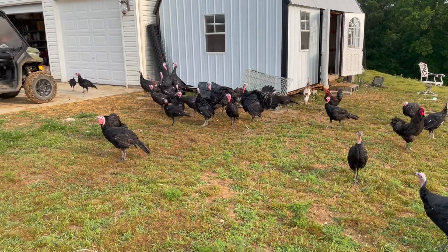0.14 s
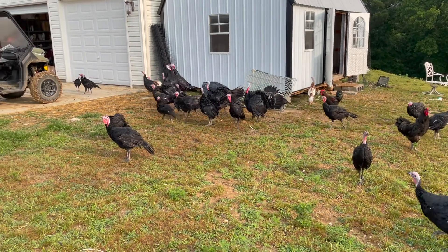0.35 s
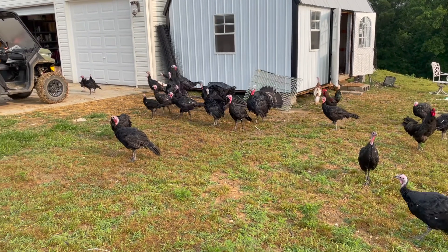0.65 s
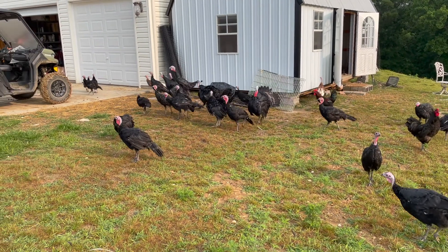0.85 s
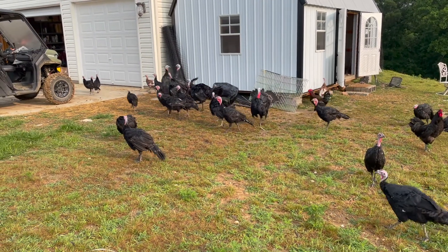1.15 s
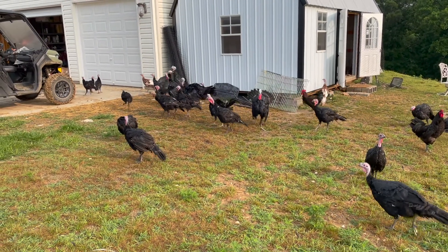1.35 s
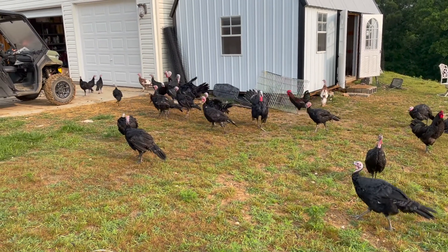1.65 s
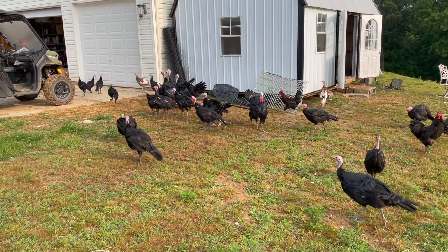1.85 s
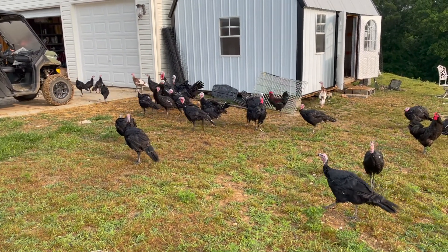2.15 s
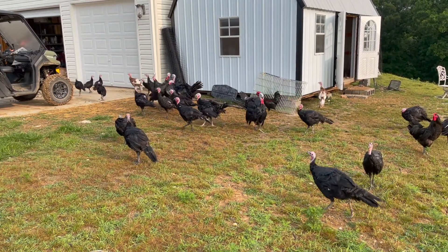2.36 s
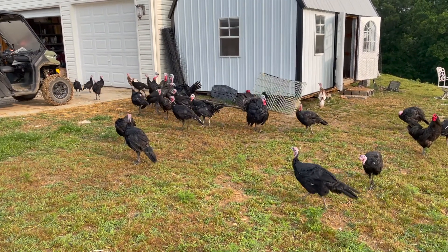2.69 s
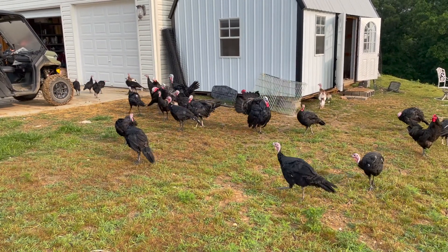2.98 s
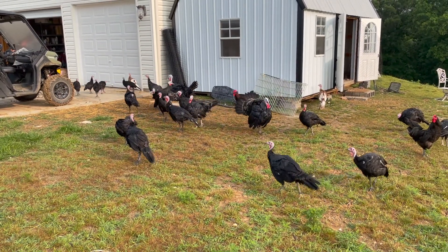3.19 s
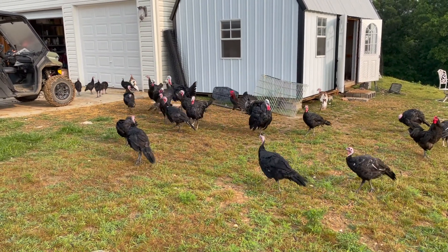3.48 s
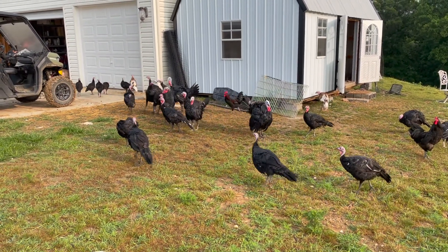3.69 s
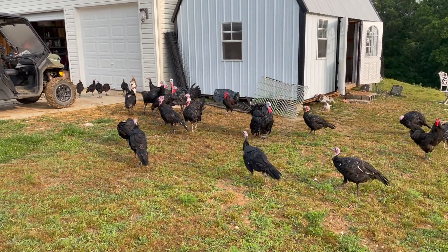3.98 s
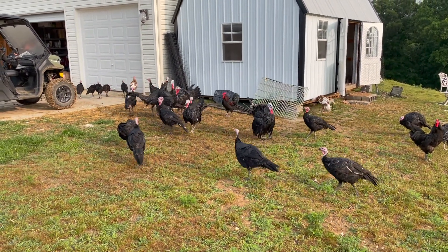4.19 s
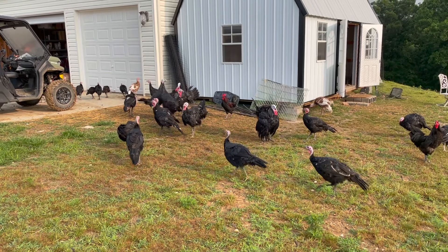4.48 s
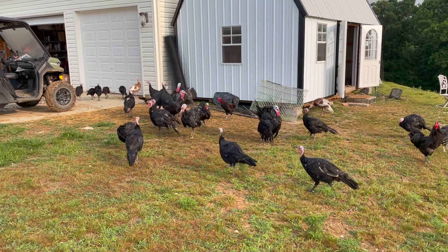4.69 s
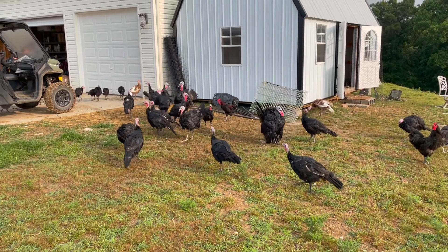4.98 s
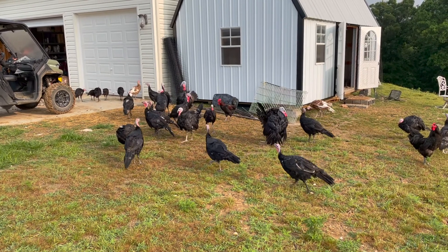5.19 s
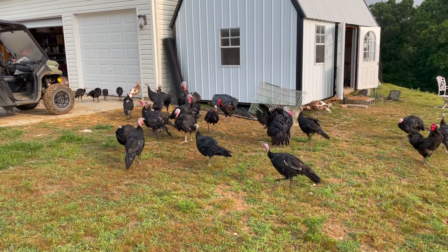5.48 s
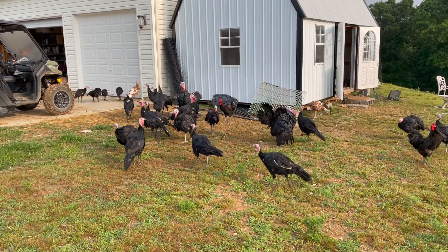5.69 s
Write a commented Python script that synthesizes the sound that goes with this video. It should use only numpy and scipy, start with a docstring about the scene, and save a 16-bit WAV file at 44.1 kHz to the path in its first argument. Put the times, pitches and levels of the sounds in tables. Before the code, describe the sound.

Overlapping turkey chirps, short rattling trills and a few hoarse yelps sound outdoors, with faint grass rustles, soft bumps and a low hum.

```python
"""On a farm lawn, turkeys whistle, chirp, trill and yelp around a hand-held stereo microphone.
Each voice is a stack of harmonics on a gliding pitch plus throat rasp, echoed by nearby walls and a barn.
Feet and feathers rustle in the grass as grainy bright noise; soft bumps are low tones with puffs of noise.
A machine hums on one drifting tone; light wind and the far yard with its insects are coloured noise."""
import sys
import numpy as np
from scipy import signal
from scipy.fft import rfft, irfft, next_fast_len
from scipy.io import wavfile
from scipy.ndimage import uniform_filter1d, map_coordinates

SR = 44100
rng = np.random.default_rng(int(sys.argv[2]) if len(sys.argv) > 2 else 0)


def log_audio(samples):
    """Write samples as a 16-bit WAV file to the path given in sys.argv[1]."""
    # one column per channel
    frames = np.atleast_2d(samples).T
    # limit to full scale, then quantise
    limited = np.clip(frames, -1, 1)
    pcm = np.round(limited * 32767).astype(np.int16)
    wavfile.write(sys.argv[1], SR, pcm)


def boost(x):
    """Linear amplitude factor 10**(x/20) for a level x in decibels (scalar or array-like)."""
    u = np.asarray(x, float) / 20
    return 10 ** u


N = 257544

# Voice levels are before the throat colour. Noise spectra give shape only: each noise is scaled to rms 1.
# long whistles, one curve each: (t/s, f/Hz, level/dB)
WHISTLE_CURVES = [
    [(0.0, 1360, -19.5), (0.03, 1241, -34), (0.05, 1105, -22), (0.1, 1057, -26), (0.13, 1230, -50)],
    [(0.1, 1378, -39), (0.14, 1465, -35), (0.185, 1530, -34)],
    [(0.445, 1038, -46), (0.48, 1046, -42), (0.52, 1048, -50)],
    [(1.24, 746, -41), (1.255, 1055, -26.5), (1.27, 1140, -25.5), (1.28, 1480, -39)],
    [(0.33, 1610, -27), (0.352, 1330, -18), (0.38, 1220, -18), (0.39, 1186, -25.5), (0.42, 1039, -17)],
    [(0.445, 1483, -38), (0.475, 1294, -32), (0.5, 1530, -38), (0.52, 1350, -54.5)],
    [(0.685, 1544, -24), (0.705, 1330, -17), (0.725, 1225, -17), (0.75, 1201, -20), (0.77, 1090, -26.5),
     (0.795, 1385, -25.5)],
    [(0.9, 788, -54), (0.92, 1162, -36.5), (0.97, 1106, -41), (1.05, 1056, -42), (1.14, 1131, -40),
     (1.18, 1060, -36), (1.215, 675, -52.5)],
    [(1.31, 1220, -43.5), (1.37, 1063, -36.5), (1.395, 680, -56)],
    [(1.44, 1662, -37.5), (1.455, 1653, -24), (1.5, 1460, -36), (1.508, 1520, -47), (1.52, 1546, -25.5),
     (1.57, 760, -41.5)],
    [(2.09, 1077, -25), (2.12, 1283, -39.5), (2.175, 1282, -23)],
    [(2.5, 1627, -38), (2.55, 1500, -29.5), (2.6, 1427, -33), (2.64, 1254, -36), (2.71, 1145, -33.5)],
    [(2.78, 1915, -36), (2.8, 2077, -37.5), (2.82, 1895, -29.5), (2.89, 1890, -54.5)],
    [(2.785, 1562, -39.5), (2.82, 1603, -36), (2.835, 1338, -28), (2.862, 1354, -29.5)],
    [(4.945, 785, -57), (4.97, 1081, -32), (5.03, 1086, -29), (5.085, 1070, -26.5)],
]
# whistle voices: (left over right/dB, 2nd harmonic/dB, 3rd harmonic/dB)
WHISTLE_VOICES = [(2.5, -24, -50), (2.5, -13, -41), (2, -2, -2.5), (7.5, -2, -33), (3, -20.5, -27.5),
                  (0, -20, -44), (1, -19.5, -31), (10, -10.5, -22), (13, -11, -35), (5.5, -40, -36),
                  (24, -10.5, -34), (7, -40, -36), (16, -26.5, -42), (2, -46, -48), (20, -16, -20.5)]
# single-glide chirps: (t/s, length/s, first f/Hz, last f/Hz, peak level/dB, place of peak/0-1, left over right/dB)
CHIRPS = [(0.033, 0.037, 1483, 1323, -30.5, .9, 3), (1.196, .025, 1690, 1030, -38.5, 0.06, 1),
          (3.046, 0.026, 1786, 1587, -22, 0.75, 11.5), (3.41, 0.025, 1785, 1624, -21, 0.78, 12),
          (1.272, .04, 1560, 1480, -20, .4, 3.5), (1.425, .03, 715, 1330, -27.5, 0.51, 6),
          (1.54, 0.079, 1540, 1452, -30, 0.94, 4), (1.62, 0.055, 1790, 1800, -46, .45, 7),
          (1.72, 0.062, 1810, 1844, -42.5, .9, 16), (1.854, 0.033, 2175, 2096, -22.5, 0.93, 1),
          (2.075, 0.02, 1560, 1490, -33, .9, 4), (2.328, 0.1, 2270, 2110, -44.5, 0.6, -1),
          (2.491, .04, 745, 1285, -25, 0.43, 6), (2.592, 0.048, 1240, 860, -30.5, .1, 10),
          (2.703, 0.029, 753, 1745, -28.5, 0.65, 13.5), (2.736, 0.022, 1970, 2024, -31, .9, -4),
          (2.73, 0.043, 4070, 3900, -41.5, 0.37, 6), (2.84, .04, 1250, 718, -34, .4, 9),
          (3.003, .032, 1580, 1380, -27.5, 0.8, 6.5), (3.475, .05, 1810, 1620, -25, .4, 20),
          (3.31, 0.039, 1074, 1070, -22.5, 0.9, 1), (3.733, .04, 1149, 1012, -18, 0.63, 1),
          (4.009, 0.038, 1570, 1620, -40.5, 0.5, 1.5), (4.064, .025, 1575, 1630, -34.5, .9, 0),
          (4.087, 0.042, 1169, 1010, -16.5, 0.56, -3.5), (4.42, .05, 1212, 1063, -11.5, .65, -4),
          (4.428, 0.034, 1770, 1630, -35.5, 0.6, 2), (4.771, 0.022, 1300, 780, -36.5, 0.17, 4),
          (4.959, 0.063, 787, 760, -43.5, 0, 2), (5.636, .12, 1750, 1470, -56.5, 0.5, 7),
          (5.74, 0.038, 1200, 1020, -52, 0.15, 18), (5.81, 0.027, 1120, 1127, -40, 0.87, 7)]
# trills, one run of notes each: (t/s, length/s, held f/Hz, level/dB)
TRILL_NOTES = [
    [(0.19, 0.022, 1188, -25), (0.258, 0.017, 1176, -26), (0.315, 0.01, 1178, -25),
     (0.372, 0.012, 1195, -26), (0.43, 0.018, 1063, -26.5)],
    [(0.518, 0.019, 1005, -28), (0.578, 0.02, 1015, -30), (0.63, 0.01, 892, -23.5),
     (0.68, 0.012, 899, -23.5), (0.728, 0.015, 922, -26.5)],
    [(1.62, 0.051, 1175, -30.5), (1.72, 0.038, 1184, -26), (1.8, 0.021, 1178, -26),
     (1.86, 0.011, 1171, -26.5), (1.915, 0.015, 1125, -24)],
    [(1.85, 0.128, 934.4, -27), (2.01, 0.021, 914, -28.5), (2.06, 0.023, 924, -23.5),
     (2.11, 0.013, 879, -22.5), (2.155, 0.019, 917, -19.5)],
    [(2.22, 0.046, 1012, -27), (2.3, 0.021, 1110, -31), (2.345, 0.021, 1030, -28),
     (2.39, 0.027, 1030, -28.5), (2.43, 0.015, 853, -35)],
    [(3.03, 0.053, 1210, -27.5), (3.135, 0.038, 1220, -25), (3.209, 0.019, 1155, -23),
     (3.268, 0.015, 1122, -22.5), (3.323, 0.013, 1110, -24)],
    [(3.825, 0.12, 1080, -31.5), (3.98, 0.031, 1091, -30.5), (4.05, 0.017, 1045, -24.5),
     (4.15, 0.019, 1045, -24.5)],
    [(4.575, 0.015, 1424, -38.5), (4.633, 0.016, 1357, -34), (4.683, 0.015, 1333, -33),
     (4.735, 0.014, 1344, -33)],
    [(5.118, 0.03, 1047, -26.5), (5.181, 0.023, 1017, -22), (5.234, 0.015, 995, -20.5),
     (5.28, 0.018, 991, -19), (5.323, 0.013, 1057, -24), (5.365, 0.011, 872, -39.5)],
]
# trill voices: (left over right/dB, 2nd harmonic/dB, f between notes/Hz,
# upward flick/dB, fall into the note/dB, slap of a near wall/dB)
TRILL_VOICES = [(4.5, -13.5, 2200, -16, -21.5, -30.5), (5, -17.5, 1600, -10.5, -34.5, -9),
                (8, -8, 1900, -14.5, -25.5, -31), (6, -10.5, 1500, -13.5, -25.5, -1.5),
                (11.5, -17, 1500, -16, -22, -1.5), (9, -7.5, 2100, -12, -32, -31),
                (12.5, -24, 1500, -13, -13, -31), (2.5, -11, 2100, -4.5, -22.5, -30),
                (8, -12, 1650, -14, -13, -2.5)]
# yelps: (bird, t/s, length/s, first pulse rate f/Hz, last f before the upturn/Hz, level/dB, left over right/dB)
YELPS = [("thin", 2.615, .105, 420, 374, -39, 0), ("hoarse", 3.06, .11, 442, 365, -25.5, 9.5),
         ("clear", 3.348, 0.11, 429, 398, -32, -3), ("hoarse", 3.428, .125, 451, 380, -27, 26),
         ("clear", 3.77, .09, 436, 380, -30, -1.5), ("clear", 4.125, 0.088, 440, 378, -27, .6),
         ("clear", 4.465, 0.078, 455, 380, -31, -2.2)]
# harmonics 1-10 of each yelping bird: (level/dB, ..)
YELP_HARMONICS = {"thin": (-23, -4.5, -6, 1.5, 13, -6, -2, -11, -12, -14),
                  "hoarse": (-37.5, -14, -8, -0.5, -3.5, -14, -13, -12, -14, -19),
                  "clear": (-36, 0, -4, 4, -20, -7, -15, -27, -29, -30)}
# hoarseness of each bird: (pitch scatter/0-1, flutter of the partials/dB, rasp over the strongest harmonic/dB)
HOARSENESS = {"thin": (.006, 2.5, -20), "hoarse": (.019, 4, -6), "clear": (.008, 2.8, -17)}
# sag of each bird: (power of the curve, under 1 early, over 1 late; level lost by the end/dB; opening swell/s)
YELP_SAG = {"thin": (1.8, 5.9, 0.031), "hoarse": (2.4, 10, .01), "clear": (.6, 5.4, 0.0027)}
# throat rasp spectrum: (f/Hz, level/dB)
RASP_SPECTRUM = [(400, -17.5), (900, 1.5), (1500, 2), (2200, 0), (2700, -28.5), (3300, -16.5),
                 (4000, -13.5), (5000, -19), (7000, -34.5), (12000, -87.5)]
# throat and the bounce off the lawn, colouring every harmonic: (f/Hz, level/dB)
THROAT = [(300, 12), (1300, -2), (1700, 3.5), (1900, -1.5), (2300, -0.5), (2700, -2), (3300, -8.5),
          (3900, -1), (4400, -12), (16000, -28)]
# first wall echoes: (delay t/s, level/dB)
WALL_ECHOES = [(.004, -16), (.012, -13), (.021, -18)]
# decay of the barn wall echo: (f/Hz, t60/s)
BARN_DECAY = [(500, 0.16), (1600, 0.22), (4000, .15), (10000, 0.11)]
# louder rustles in the grass: (t of the peak/s, nominal level/dB)
RUSTLES = [(0.535, -51), (0.747, -41), (0.933, -39.5), (1.661, -52), (1.73, -48), (1.807, -51.5),
           (2.186, -53), (2.571, -53), (3.308, -48), (3.46, -46), (3.727, -50), (3.893, -47.5),
           (4.1, -47.5), (4.53, -51.5), (5.377, -46), (5.505, -51), (5.83, -48.5)]
# dry stalks snapping: (t/s, nominal level/dB)
STALK_SNAPS = [(0.5307, -42), (2.7986, -35), (2.8948, -38.5), (3.2957, -46.5)]
# rustling grass spectrum: (f/Hz, level/dB)
BLADES_SPECTRUM = [(1500, -27.5), (3500, -3), (6500, -7), (7800, -43.5), (9000, -31.5), (11000, -9),
                   (13500, -1), (15700, -13)]
# wing feathers dragging through the grass: (t/s, level/dB)
FEATHER_SCUFF = [(4.55, -60), (4.78, -41.5), (5.0, -60.5)]
# scuff spectrum, mid: (f/Hz, level/dB)
SCUFF_MID = [(1470, -24), (2500, -8), (2720, -9), (4020, -9.5), (5020, 5), (5590, -16), (6780, 5),
             (7600, -14), (8210, -79), (8400, -55), (9070, -11), (13600, -10), (15600, -15)]
# scuff spectrum, side, shared by the grass blades: (f/Hz, level/dB)
SCUFF_SIDE = [(1470, -35.5), (2500, -7.5), (3960, -30), (5140, 1), (6470, -5.5), (9140, -2), (13100, -25),
              (13400, -68), (15600, -85.5)]
# soft bumps near the microphone: (t/s, push level/dB, push f/Hz, puff level/dB)
BUMPS = [(0.459, -53, 143, -53), (0.659, -28.5, 65.5, -66), (0.749, -30, 56.5, -44.5),
         (0.927, -29, 49.4, -36), (1.597, -41, 110, -48), (1.831, -63, 154, -46), (3.421, -40, 144, -51.5),
         (3.881, -39.5, 145, -56), (4.97, -33.5, 150.6, -50), (5.307, -26, 96, -71)]
# machine hum: (t/s, f/Hz, level/dB)
MACHINE_HUM = [(0.0, 152, -71), (0.06, 156.7, -53), (1.949, 159.4, -37.5), (5.071, 162, -38.5),
               (5.84, 161.8, -45)]
# wind: (t/s, rumble level/dB, buffet level/dB)
WIND_LEVELS = [(0.0, -42.5, -44), (0.28, -45.5, -55), (0.85, -41.5, -43.5), (3.74, -43.5, -74),
               (4.31, -42.5, -51), (5.16, -44.5, -52.5), (5.34, -34.5, -39), (5.45, -47, -51),
               (5.84, -39.5, -45)]
# wind rumble spectrum: (f/Hz, level/dB)
RUMBLE_SPECTRUM = [(45, -7), (60, 1), (125, -0.5), (150, -7), (190, -26.5)]
# wind buffet spectrum: (f/Hz, level/dB)
BUFFET_SPECTRUM = [(12, -27.5), (25, -9), (50, -4.5), (65, -19.5)]
# far yard noise and the insect band, mid: (f/Hz, level/dB)
AIR_MID = [(110, -27), (180, -4.5), (213, -8.5), (475, -24.5), (1100, -25.5), (2160, -33), (2550, -39),
           (5600, -37.5), (6740, -19.5), (7400, -32.5), (7980, -93), (9800, -58.5), (11200, -43.5),
           (14000, -37.5), (15600, -60.5)]
# far yard noise and the insect band, side: (f/Hz, level/dB)
AIR_SIDE = [(110, -33.5), (180, 1.5), (293, -16), (484, -14), (1120, -12.5), (1330, -21.5), (2240, -20.5),
            (2650, -32), (7000, -13.5), (7830, -23.5), (11200, -27.5), (13000, -49.5), (15600, -75.5)]

RISE_DB, FADE_DB = 19, 15.5  # a chirp's climb and fall, each over a whole note length; yelps open with RISE_DB too
SECOND_DB, DULLER_DB = -18, 25.5  # 2nd harmonic of a chirp near 1 kHz; its loss per octave up
BRIGHTER_DB = 10  # gain of that harmonic per octave of upward glide
THIRD_UNDER_DB = 12.5  # 3rd harmonic under the 2nd, before a rising chirp lowers it further
OVERTONE_SPREAD, OVERTONE_LEFT_DB = 0.089, 6.5  # overtones spread less than the tone and lean left
TRILL_RASP_DB, CHIRP_RASP_DB = -21, -25  # the chirp figure is for a level or falling glide
SLAP_S = 0.012  # delay of the near wall slap in trills
LIFT, LIFT_SHARE = 0.06, 0.06  # upturn at a yelp's end: share of the last pitch, time constant as share of length
RUSTLE_RISE_S, RUSTLE_FALL_S = 0.017, 0.022
PATTER_DB, PATTER_SWING_DB = -70, 5.5  # small steps all the time


def unit(x):
    """Scales a signal to rms 1."""
    return x / np.sqrt(np.mean(x ** 2) + 1e-20)


def along(points, hz):
    """Reads (f/Hz, level/dB) points on a log frequency axis, near silent outside them."""
    f, v = np.transpose(points)
    return np.interp(np.log(hz + 1), np.log(f + 1), v, left=-120, right=-120)


def wobble(rate, size=N):
    """A smooth random curve through `rate` random knots a second."""
    knots = rng.standard_normal(int(size * rate / SR) + 4)
    return map_coordinates(knots, [np.arange(size) * rate / SR])


def noise(spectrum, size=N):
    """Coloured noise of rms 1: white noise weighted in frequency."""
    m = next_fast_len(size + 4096)
    weight = boost(along(spectrum, np.fft.rfftfreq(m, 1 / SR)))
    return unit(irfft(rfft(rng.standard_normal(m)) * weight, m)[:size])


def pair(mid, side, side_db, shared):
    """Stereo noise: part of the side is the same wave as the mid, a quarter cycle apart."""
    m = next_fast_len(N)
    hz = np.fft.rfftfreq(m, 1 / SR)
    a, b = rfft(rng.standard_normal((2, m)))
    side_wave = 1j * shared * a + np.sqrt(1 - shared ** 2) * b
    centre = unit(irfft(a * boost(along(mid, hz)), m)[:N])
    apart = unit(irfft(side_wave * boost(along(side, hz)), m)[:N])
    return centre + boost(side_db) * apart * np.array([[1], [-1]])


def add(out, s, x):
    """Mixes x into out from time s."""
    i = round(s * SR)
    out[:, i:i + x.shape[-1]] += x


def sing(out, rows, pans, harmonics_db, scatter, flutter_db, rasp_db):
    """A syrinx tone: harmonics on an unsteady pitch curve, with breath noise that swells once a cycle."""
    s, hz, db = np.transpose(rows)
    t = np.arange(s[0], s[-1], 1 / SR)

    def smooth(curve):
        return uniform_filter1d(np.interp(t, s, curve), size=110, mode="nearest")

    level = smooth(db)
    weakness = np.clip(db.max() - level - 8, 0, 20)
    shaky = scatter * (1 + weakness * 0.5)  # weak stretches lose their hold on pitch
    pitch = smooth(hz) * (1 + shaky * wobble(180, len(t)))
    phase = 2 * np.pi * np.cumsum(pitch) / SR
    edge = np.clip(np.minimum(t - s[0], s[-1] - t) / 0.0042, 0, 1)
    x = np.zeros((2, len(t)))
    for k, own_db in enumerate(harmonics_db):
        pan = pans[k >= len(harmonics_db) / 3]  # lower partials take the first pan, upper ones the second
        lead = rng.normal(0.097, 0.87) / 2  # each side hears the partial at another phase
        # overtones fade faster when the voice is soft
        soft = 1.5 * (k > 0) * np.minimum(level - db.max() + 4, 0)
        colour = along(THROAT, (k + 1) * pitch)
        size = boost(own_db + soft + colour + flutter_db * wobble(47.8, len(t)))
        size *= 1 + (0.03 + 0.06 * flutter_db) * wobble(500, len(t))  # a noisy skirt round each partial
        left_right = boost(np.array([[pan / 2], [-pan / 2]])) / np.cosh(pan / 17.4)  # steady sum of both sides
        wave = np.sin((k + 1) * phase + k + np.array([[lead], [-lead]]))
        x += size * left_right * np.sqrt(2) * wave
    rasp_mid, rasp_side = noise(RASP_SPECTRUM, len(t)), noise(RASP_SPECTRUM, len(t))
    rasp = rasp_mid + 0.6 * rasp_side * np.array([[1], [-1]])
    gate = 1 + 0.37 * np.sin(phase)
    x += boost(rasp_db + max(harmonics_db)) * gate * rasp
    add(out, s[0], x * edge * boost(level))


def whistle(out, rows, pan_db, second_db, third_db, scatter, rasp_db):
    """A syrinx tone with two overtones."""
    pans = pan_db, OVERTONE_SPREAD * pan_db + OVERTONE_LEFT_DB
    sing(out, rows, pans, (0, second_db, third_db), scatter, flutter_db=1.3, rasp_db=rasp_db)


def chirp(out, s, length, first_hz, last_hz, db, peak, pan_db):
    """One glide that swells to its peak and fades; low and rising chirps carry the strongest 2nd harmonic."""
    share = np.array([0, np.clip(peak, 0, 1), 1])
    bend = 0.65 if last_hz > first_hz else 1.3  # rising glides move early, falling ones late
    pitch = first_hz + (last_hz - first_hz) * share ** bend
    level = db - np.array([RISE_DB, 0, FADE_DB]) * abs(share - share[1])
    rows = np.c_[s + length * share, pitch, level]
    rising_db = BRIGHTER_DB * max(np.log2(last_hz / first_hz), 0)
    second_db = SECOND_DB - DULLER_DB * np.log2((first_hz + last_hz) / 2045.0) + rising_db
    third_db = second_db - THIRD_UNDER_DB - rising_db / 2
    whistle(out, rows, pan_db, second_db, third_db, scatter=0.006, rasp_db=CHIRP_RASP_DB + rising_db)


def trill_note(s, length, hz, db, top_hz, flick_db, fall_db):
    """The voice falls onto the pitch, swells as it holds it nearly level, and flicks up, weak while high."""
    first_hz, first_db = hz * (1 + 0.5 * length), db - 45 * length
    end = s + length
    fall = [(s - 0.012, top_hz * 0.9, db + fall_db), (s, first_hz * 1.03, first_db - 5)]
    hold = [(s + 0.004, first_hz, first_db), (end - 0.002, hz * 1.01, db)]
    flick = [(end + 0.003, hz * 1.17, db - 5), (end + 0.008, top_hz, db + flick_db)]
    fade = [(end + 0.015, top_hz, db + flick_db - 16)]
    return sorted(fall + hold + flick + fade)


def trill(out, notes, pan_db, second_db, top_hz, flick_db, fall_db, slap_db):
    """A run of hooked notes, each followed by its slap off the wall, returned as a layer shaped like out."""
    own = np.zeros_like(out)
    for s, length, hz, db in notes:
        voiced_s = max(length - SLAP_S * boost(slap_db), 0.008)  # a listed length includes a loud slap
        rows = trill_note(s, voiced_s, hz, db, top_hz, flick_db, fall_db)
        third_db = second_db - THIRD_UNDER_DB
        whistle(own, rows, pan_db, second_db, third_db, scatter=0.008, rasp_db=TRILL_RASP_DB)
    return own + boost(slap_db) * np.roll(own, round(SLAP_S * SR), axis=1)


def yelp(out, bird, s, length, first_hz, last_hz, db, pan_db):
    """Pitch and level sag together as the breath runs out; the pitch turns up at the end."""
    share = np.linspace(0, 1, num=24)
    power, loss_db, swell_s = YELP_SAG[bird]
    sag = share ** power
    upturn = last_hz * LIFT * np.exp((share - 1) / LIFT_SHARE)
    pitch = first_hz + (last_hz - first_hz) * sag + upturn
    level = db - loss_db * sag - RISE_DB * np.exp(-length * share / swell_s)
    rows = np.c_[s + length * share, pitch, level]
    pans = pan_db, OVERTONE_SPREAD * pan_db + OVERTONE_LEFT_DB / 2
    sing(out, rows, pans, YELP_HARMONICS[bird], *HOARSENESS[bird])


def turkeys():
    """All whistles, chirps, yelps and trills of the flock."""
    out = np.zeros((2, N + SR))
    for rows, voice in zip(WHISTLE_CURVES, WHISTLE_VOICES):
        whistle(out, rows, *voice, scatter=0.007, rasp_db=-20)
    for row in CHIRPS:
        chirp(out, *row)
    for row in YELPS:
        yelp(out, *row)
    trills = sum(trill(out, notes, *voice) for notes, voice in zip(TRILL_NOTES, TRILL_VOICES))
    return (out + trills)[:, :N]


def near_walls(x):
    """First echoes: delayed, quieter copies with left and right swapped."""
    out = np.zeros_like(x)
    for s, db in WALL_ECHOES:
        out += boost(db) * np.pad(x[::-1], ((0, 0), (round(s * SR), 0)))[:, :N]
    return out


def barn_echo(x):
    """A tail of noise in which each frequency dies at its own speed, convolved with the sound."""
    hz, t, z = signal.stft(rng.standard_normal((2, SR // 2)), SR, nperseg=256)
    t60 = np.interp(hz, *np.transpose(BARN_DECAY))[:, None]
    tail = signal.istft(z * boost(-60 * t / t60), SR, nperseg=256)[1]
    late = np.pad(x, ((0, 0), (500, 0)))  # pre-delay in samples
    return signal.fftconvolve(late, tail / np.linalg.norm(tail[0]), axes=1)[:, :N]


def grass():
    """Rustles, snaps, patter and one long scuff: bright noise under swells, grainy in the blades."""
    swell, t = np.zeros((1, N + SR)), np.arange(SR // 4) / SR
    lead = 3 * RUSTLE_RISE_S
    shape = np.exp(-((t - lead) / np.where(t < lead, RUSTLE_RISE_S, RUSTLE_FALL_S)) ** 2)
    for s, db in RUSTLES:
        add(swell, s - lead, boost(db - 10.0) * shape)
    for s, db in STALK_SNAPS:
        add(swell, s, boost(db - 6.5) * np.exp(-t / 0.002))
    swell = swell[:, :N] + boost(PATTER_DB + PATTER_SWING_DB * wobble(14))
    grain = boost(1.7 * wobble(450))
    blades = swell * grain * pair(BLADES_SPECTRUM, SCUFF_SIDE, side_db=-4, shared=0.8)
    s, db = np.transpose(FEATHER_SCUFF)
    scuff = boost(np.interp(np.arange(N) / SR, s, db, left=-120, right=-120))
    return blades + scuff * pair(SCUFF_MID, SCUFF_SIDE, side_db=-0.5, shared=0.8)


def bumps():
    """Each bump is one low push and a dull puff of noise under the same quick swell."""
    out, t = np.zeros((2, N + SR)), np.arange(SR // 5) / SR
    swell = (t / 0.016) * np.exp(1 - t / 0.016)
    for s, db, hz, puff_db in BUMPS:
        puff = noise([(150, -3.5), (300, -1.5), (600, -4.5), (1500, -16)], len(t))
        push = np.sin(2 * np.pi * hz * t)
        add(out, s, swell * (boost(db) * push + boost(puff_db) * puff))
    return out[:, :N]


def machine_hum():
    """A single sine with drifting pitch and level, slightly out of phase between left and right."""
    t = np.arange(N) / SR
    s, hz, db = np.transpose(MACHINE_HUM)
    phase = 2 * np.pi * np.cumsum(np.interp(t, s, hz)) / SR
    level = boost(np.interp(t, s, db) + 0.77 * wobble(8.2))
    return level * np.sqrt(2) * np.sin(phase + np.array([[-0.19], [0.19]]))


def wind():
    """Two bands of low noise, a rumble and a deeper, wider buffet, each swaying in level."""
    t = np.arange(N) / SR
    s, rumble_db, buffet_db = np.transpose(WIND_LEVELS)
    rumble = boost(np.interp(t, s, rumble_db) + 0.47 * wobble(10.0))
    buffet = boost(np.interp(t, s, buffet_db) + 2.2 * wobble(8))
    out = rumble * pair(RUMBLE_SPECTRUM, RUMBLE_SPECTRUM, side_db=-11, shared=0.4)
    return out + buffet * pair(BUFFET_SPECTRUM, BUFFET_SPECTRUM, side_db=-4.0, shared=0.3)


def far_air():
    """Far yard noise and insect hiss: wide coloured noise that wavers in level."""
    level = boost(-49.5 + 1.4 * wobble(11) + 1.4 * wobble(14))
    return level * pair(AIR_MID, AIR_SIDE, side_db=-6.5, shared=0.7)


def scene():
    """Birds with their echoes over grass, bumps and background."""
    birds = turkeys()
    echoes = near_walls(birds) + boost(-14) * barn_echo(birds)
    background = machine_hum() + wind() + far_air()
    return birds + echoes + grass() + bumps() + background


def top_cut(x):
    """Nothing passes above the cut-off."""
    return signal.sosfilt(signal.butter(12, 15780, fs=SR, output="sos"), x)


def record(dry):
    """The microphone housing dips near 2.7 kHz; a steep low-pass then limits the band."""
    b, a = signal.iirnotch(2700, 6, fs=SR)
    dipped = dry - 0.23 * (dry - signal.lfilter(b, a, dry))
    low_pass = signal.butter(12, 15780, fs=SR, output="sos")
    limited = signal.sosfiltfilt(low_pass, dipped)
    return top_cut(limited)


dry = scene()
out = record(dry)
log_audio(out)
```